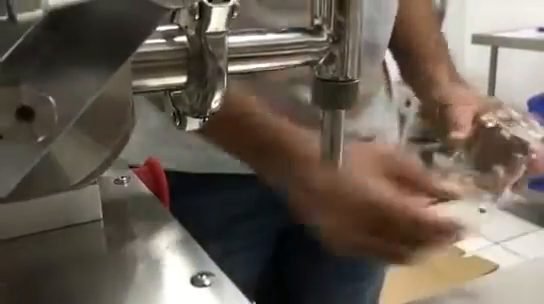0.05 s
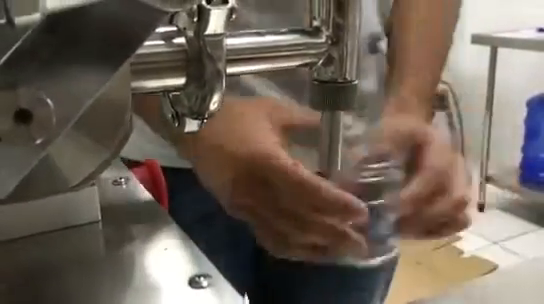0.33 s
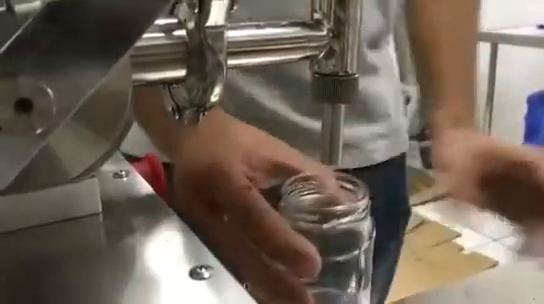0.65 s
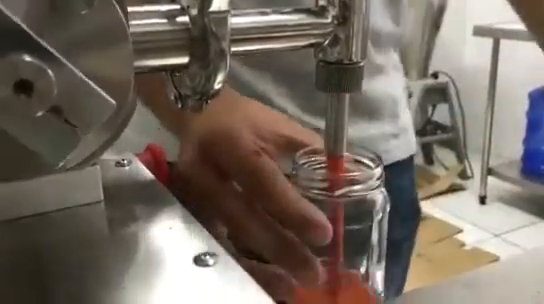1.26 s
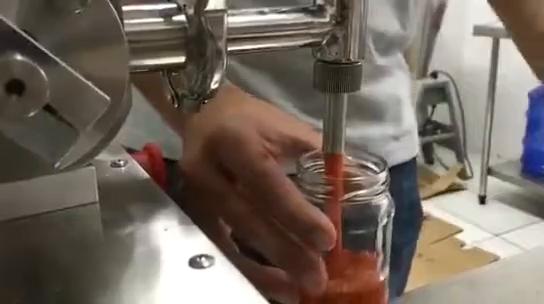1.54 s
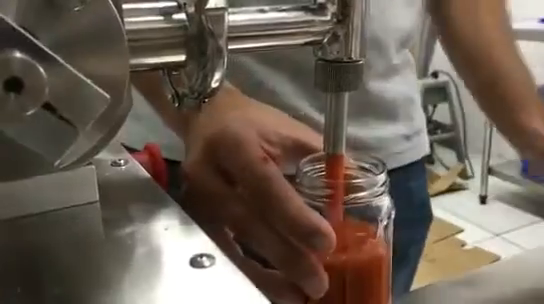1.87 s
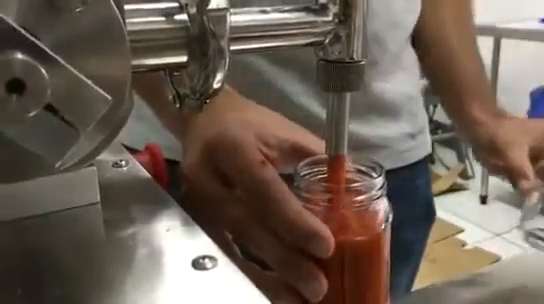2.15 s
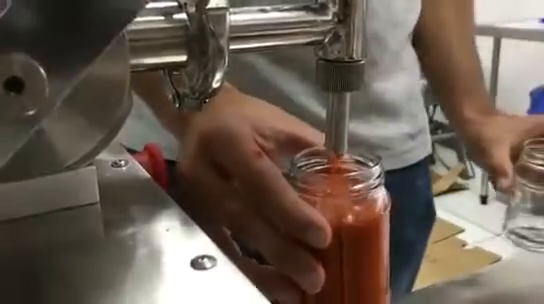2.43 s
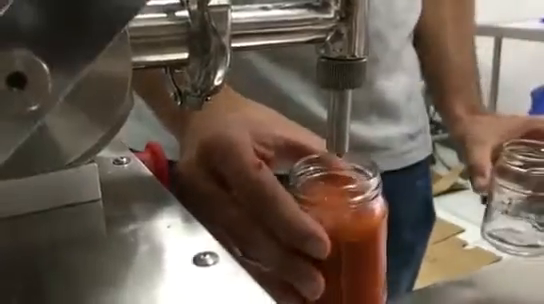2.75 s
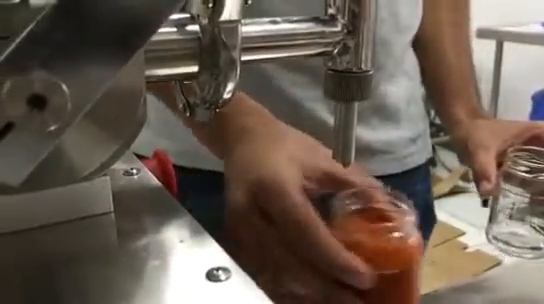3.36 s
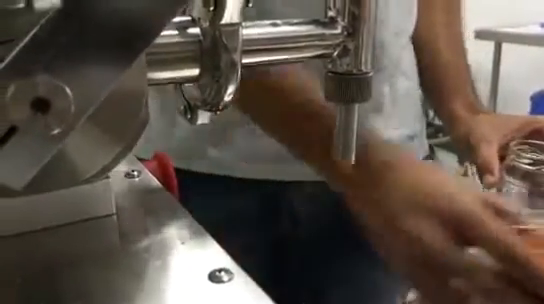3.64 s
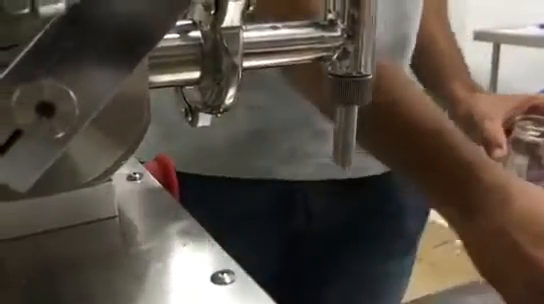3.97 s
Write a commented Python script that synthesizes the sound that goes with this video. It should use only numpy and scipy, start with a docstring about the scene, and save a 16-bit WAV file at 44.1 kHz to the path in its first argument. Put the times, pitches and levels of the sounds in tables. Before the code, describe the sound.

A pneumatic filling machine clacks and hisses over a steady motor hum.

```python
"""Motor hum and a brief scrape open the scene: a hard-walled workroom with a pneumatic piston filler.
An air valve snaps over and exhausts in a turbulent jet, and the rotary sauce valve knocks on its stop.
Air hisses through the stroke, coloured by steel resonances, as the piston doses thick sauce into a jar.
The valve snaps back with another exhaust, and the full jar slides and taps over the steel table."""
import sys
import numpy as np
from scipy import signal
from scipy.fft import rfft, irfft
from scipy.io import wavfile
from scipy.ndimage import uniform_filter1d

SR = 44100
rng = np.random.default_rng(int(sys.argv[2]) if len(sys.argv) > 2 else 0)


def store_pcm(level_fs):
    """Save levels as 16-bit WAV."""
    pcm = np.round(np.clip(level_fs, -1, 1) * 32767).astype(np.int16)
    wavfile.write(sys.argv[1], SR, np.atleast_2d(pcm).T)


N = 176400
TIME, FREQS = np.arange(N) / SR, np.fft.rfftfreq(N, 1 / SR)


def amp(db):
    """Amplitude ratio of a level in decibels."""
    return 10 ** (np.asarray(db) / 20)

def unit_rms(x):
    """Normalisation to an rms of 1."""
    return x / np.sqrt(np.mean(x ** 2) + 1e-20)

def curve_at(points, hz):
    """Interpolation on a logarithmic frequency axis."""
    freqs, values = np.transpose(points)
    return np.interp(np.log(hz + 1), np.log(freqs + 1), values)

def add(mix, start, sound):
    """Superposition of a sound on the mix, from a start time in seconds."""
    part = mix[round(start * SR):][:len(sound)]
    part += sound[:len(part)]

def hump(middle, length):
    """Gaussian envelope: a smooth rise and fall."""
    return np.exp(-2 * ((TIME - middle) / length) ** 2)

def tone(hz):
    """Simple harmonic motion with a random phase."""
    return np.sin(2 * np.pi * (hz * TIME + rng.random()))

def noise(gain):
    """Random-phase noise of unit rms with the given spectral shape."""
    return unit_rms(irfft(gain * np.exp(2j * np.pi * rng.random(N // 2 + 1)), N))

def band(hz, half_width_hz):
    """Random excitation of one resonance gives narrow-band noise."""
    return noise(1 / (1 + ((FREQS - hz) / half_width_hz) ** 2))

def mode(start, hz, t60):
    """Free vibration of a damped oscillator, falling 60 dB in t60 seconds."""
    t = np.maximum(TIME - start, 0)
    return np.exp(-np.log(1000) * t / t60) * np.sin(2 * np.pi * hz * t)

def impact(rise_s, decay_s, spectrum):
    """Modal overlap: the dense modes of a struck part merge into a decaying burst of noise."""
    t = np.arange(SR // 2) / SR
    envelope = np.minimum(t / rise_s, 1) * np.exp(-t / decay_s)
    burst = rfft(envelope * rng.standard_normal(len(t)), SR)  # 1 Hz per bin
    burst /= np.sqrt(uniform_filter1d(abs(burst) ** 2, size=500) + 1e-12)  # whitening
    gain = amp(curve_at(spectrum, np.arange(len(burst))))
    coloured = irfft(burst * gain)[:len(t)]
    return unit_rms(coloured) * np.sqrt(np.mean(envelope ** 2))

# Ambient noise spectrum (frequency [Hz], relative level [dB])
AMBIENT_SPECTRUM = [(20, -37), (32, -19.5), (49, -4.5), (70, -10), (105, -14), (128, -2.5), (145, -13.5),
                    (169, -12), (205, -9.5), (250, -14.5), (314, -17), (390, -18), (490, -20.5), (700, -21),
                    (911, -22.5), (1200, -19.5), (1800, -21), (2150, -21.5), (2400, -27.5), (2650, -25),
                    (3000, -30), (3900, -31), (4250, -28), (5000, -33.5), (6500, -31.5), (7500, -33)]
def workroom(level_db=-31, flicker_db=2):
    """Broadband noise of fans and distant machines, modulated at random in time and frequency."""
    steady = noise(amp(curve_at(AMBIENT_SPECTRUM, FREQS)))
    spectra = signal.stft(steady, nperseg=512)[2]
    patches = uniform_filter1d(rng.standard_normal(spectra.shape), size=6, axis=0)
    patches = unit_rms(uniform_filter1d(patches, size=8, axis=1))
    return amp(level_db) * signal.istft(spectra * amp(flicker_db * patches), nperseg=512)[1][:N]

# Motor tones (frequency [Hz], level [dB], noise half-width [Hz], noise amplitude share [0-1])
MOTOR_TONES = [(64.6, -36.5, 3.6, .75), (85.5, -38.5, 4, .6), (104.54, -36.5, 2.8, .45),
               (120.2, -35.5, 3.2, .6), (162.2, -44.5, 9, 0.9), (351, -42.5, 9.4, 0.9),
               (366.7, -48, 9.4, 0.9), (585, -50.5, 9, 1), (766, -53, 14, 1)]
def motors(swell_db=-28, swell_hz=(81, 100.2)):
    """Beating: motor tones waver against narrow-band noise, and two low tones throb in one swell."""
    out = amp(swell_db) * hump(middle=0.76, length=0.32) * sum(tone(hz) for hz in swell_hz)
    for hz, db, half_width_hz, share in MOTOR_TONES:
        steady = np.sqrt(2 * (1 - share ** 2)) * tone(hz)
        out += amp(db) * (steady + share * band(hz, half_width_hz))
    return out

# Reverberation time of the workroom (frequency [Hz], T60 [s])
REVERB_TIMES = [(100, 0.39), (1000, 0.43), (3000, 0.22), (7500, 0.061)]
def reverberation(sound, level_db=-4.5, reflections_per_s=2000, gap_s=0.004):
    """Absorption: sparse wall reflections decay exponentially, each band at its own rate."""
    reflections = rng.choice([-1., 1.], SR) * (rng.random(SR) < reflections_per_s / SR)
    reflections *= np.arange(SR) > gap_s * SR
    hz, t, spectra = signal.stft(reflections, SR, nperseg=256)
    decay = np.exp(-np.log(1000) * t / curve_at(REVERB_TIMES, hz)[:, None])
    tail = signal.istft(spectra * decay, SR, nperseg=256)[1]
    return amp(level_db) * signal.fftconvolve(sound, tail / np.linalg.norm(tail))[:N]

# Sliding movements (mid time [s], duration [s], level [dB], centre frequency [Hz], width [octaves])
SLIDES = [(0.007, 0.12, -31.5, 1490, 1.44), (0.05, 0.35, -40, 2600, 1.9), (1.953, 0.28, -30.5, 1700, 1.4),
          (2.77, 0.11, -40.5, 3060, 2.5), (3.08, 0.19, -38, 2500, 2.2), (3.198, 0.18, -39, 2500, 2.1),
          (3.455, 0.18, -35.5, 2300, 1.7), (3.465, 0.06, -33.5, 2650, .8), (3.45, 0.11, -33.5, 405, 0.33),
          (3.123, 0.14, -39.5, 410, 0.49), (3.7, 0.34, -42.5, 2240, 0.98), (3.914, 0.079, -39.5, 1990, 1.8)]
def friction(grain_db=2.6):
    """Sliding friction of piston, hand and jar: grainy noise swells and fades with each movement."""
    out = np.zeros(N)
    for middle, length, db, hz, octaves in SLIDES:
        colour = 1 / (1 + (2 * np.log2((FREQS + 1) / hz) / octaves) ** 2)
        roughness_db = grain_db * band(0, half_width_hz=49)
        out += amp(db + roughness_db) * hump(middle, length) * noise(colour)
    return out

# Spectrum of the struck jar (frequency [Hz], relative level [dB])
GLASS_SPECTRUM = [(300, -19), (1300, -8), (1750, -16.5), (2150, 3.5), (2700, 1), (3100, -13), (3700, -7.5),
                  (4500, -13.5), (7500, -16), (9000, -51.5)]
# Contacts of the handled jar (time [s], level [dB])
JAR_CONTACTS = [(3.03, -31), (3.218, -30), (3.231, -32), (3.356, -32), (3.38, -31), (3.432, -30),
                (3.463, -27), (3.648, -33), (3.728, -34), (3.8375, -21.5), (3.9, -33)]
def jar_taps():
    """Damped impacts: the glass catches and taps while the hand absorbs its ringing."""
    out = np.zeros(N)
    for start, db in JAR_CONTACTS:
        add(out, start, amp(db) * impact(rise_s=0.00065, decay_s=0.004, spectrum=GLASS_SPECTRUM))
    return out

# Air-line whistles (mid time [s], duration [s], level [dB], frequency [Hz], half-width [Hz])
LINE_WHISTLES = [(1.15, .1, -33, 3150, 60), (1.22, .16, -32, 3920, 110), (1.42, .2, -40, 2950, 24),
                 (1.57, .09, -39.5, 2950, 24), (2.1, .7, -48.5, 6040, 65)]
def whistles():
    """Flow-excited resonance: escaping air sounds one pitch after another as the pressure changes."""
    return sum(amp(db) * hump(middle, length) * band(hz, half_width_hz)
               for middle, length, db, hz, half_width_hz in LINE_WHISTLES)

# Resonances of the steel body and air line (frequency [Hz], width [Hz], peak gain [dB])
STEEL_RESONANCES = [(1609, 22, 6), (1840, 40, 3), (2110, 22, 4), (2477, 22, 8), (2916, 20, 6),
                    (2960, 45, 5), (3134, 30, 6), (3247, 16, 5), (3400, 35, 3), (3662, 22, 6),
                    (3854, 24, 6), (4020, 22, 4), (4220, 26, 4), (4370, 16, 6), (5250, 60, 3),
                    (5690, 40, 4), (6010, 40, 4), (6147, 20, 7), (6670, 40, 5)]
def steel_gain_db():
    """Resonance: the machine lifts narrow bands of the sound that passes through it."""
    return sum(db / (1 + (2 * (FREQS - hz) / width) ** 2) for hz, width, db in STEEL_RESONANCES)

def air_jet(spectrum):
    """Source and filter: turbulent noise is shaped by its port and by the machine's resonances."""
    return noise(amp(curve_at(spectrum, FREQS) + steel_gain_db()))

# Envelope of the air bleeding from the cylinder (time [s], level [dB])
BLEED_ENVELOPE = [(1.1, -64), (1.25, -38), (1.45, -30.5), (1.7, -29), (1.9, -30.5), (2.1, -31.5),
                  (2.289, -31.5), (2.5, -32), (2.9, -46)]
# Spectrum of that air (frequency [Hz], relative level [dB])
BLEED_SPECTRUM = [(500, -14.5), (1200, -18), (1800, 1), (2300, -10.5), (2950, -2), (3350, -3), (3850, 0.5),
                  (4500, -0.5), (5200, -8), (6050, -4), (6800, -9.5), (7500, -8.5)]
def piston_stroke():
    """Throttled flow: air bleeds out in a sustained hiss while the piston pushes the sauce."""
    level_db = np.interp(TIME, *np.transpose(BLEED_ENVELOPE), left=-120, right=-120)
    return amp(level_db) * air_jet(BLEED_SPECTRUM)

# Recoils of the frame (time [s], level [dB])
RECOILS = [(1.096, -20), (2.3255, -13)]
def frame_thumps(hz=190, t60=0.05):
    """Reaction force: each switch of the air valve excites one low mode of the frame."""
    return sum(amp(db) * mode(start, hz, t60) for start, db in RECOILS)

# Modes of the rotary valve's stop (frequency [Hz], level [dB], T60 [s])
STOP_RESONANCES = [(555, -17.5, .04), (655, -18, .14), (705, -30, .11), (1254, -36, .2), (2030, -12, .022),
                   (2380, -10.5, .02), (2950, -18, .02)]
# Strikes on the stop (time [s], gain [dB])
STOP_STRIKES = [(1.1802, 0), (2.523, -15)]
def stop_ring():
    """Modal superposition: struck by the rotary valve, the stop gives a short hollow clunk."""
    return sum(amp(strike_db + db) * mode(start, hz, t60)
               for start, strike_db in STOP_STRIKES for hz, db, t60 in STOP_RESONANCES)

# Spectra of parts 0-3: valve body, rotary stop, frame, valve spool (frequency [Hz], relative level [dB])
PART_SPECTRA = [
    [(60, -12), (180, 2), (330, -3), (520, -12), (1000, -2), (1400, -2), (1800, 1), (2500, 1), (3050, -2),
     (3700, -13), (5000, -19), (7500, -21), (9000, -50)],
    [(100, -18), (350, -14), (520, 1), (640, 5), (850, -5), (1500, -9), (2000, 1), (2350, 4), (2700, -7),
     (5000, -19), (7500, -26), (9000, -50)],
    [(80, -4), (220, 1), (500, -2), (1000, 1), (1550, 1), (2300, -8), (3000, -7), (4500, -13), (5800, -12),
     (7500, -20), (9000, -50)],
    [(500, -25), (2000, -16), (3800, -12), (4700, -17), (5700, -7), (6350, -10), (6750, 2), (7050, 0),
     (7600, -5), (9000, -50)],
]
# Impacts in the machine (time [s], level [dB], rise time [s], decay time constant [s], part [index])
MACHINE_IMPACTS = [(1.028, -40, .002, .012, 3), (1.071, -31, .004, .025, 3), (1.069, -23, .018, .02, 0),
                   (1.0858, -13, .002, .004, 3), (1.0895, -14.5, .001, .005, 0),
                   (1.097, -23, .001, .006, 0), (1.178, -17, .002, .004, 1), (1.562, -36, .002, .015, 0),
                   (1.714, -32, .003, .02, 3), (1.7205, -17, .004, .01, 2), (1.732, -22, .001, .01, 2),
                   (1.749, -23.5, .002, .014, 2), (2.307, -26, .012, .012, 0),
                   (2.3205, -22.5, .001, .01, 3), (2.3243, -8.5, .001, .0035, 0),
                   (2.331, -24, .001, .008, 0), (2.355, -25, .001, .005, 0), (2.521, -25.5, .003, .012, 1),
                   (2.523, -24.5, .003, .016, 2), (2.722, -41, .002, .012, 3)]
def knocks(resonance_depth=0.93):
    """Impulse response: valves and frame take blows, and the steel body rings on after each."""
    blows = np.zeros(N)
    for start, db, rise_s, decay_s, part in MACHINE_IMPACTS:
        add(blows, start, amp(db) * impact(rise_s, decay_s, PART_SPECTRA[part]))
    # A one-sided cepstrum gives minimum phase, so the ringing follows the blow.
    cepstrum = irfft(np.log(amp(resonance_depth * steel_gain_db())), N)
    one_sided = (1 + np.sign(TIME)) * (np.arange(N) < N // 2)
    body_response = np.exp(rfft(cepstrum * one_sided))
    return irfft(rfft(blows) * body_response, N)

# Spectra of exhaust ports 0 and 1 (frequency [Hz], relative level [dB])
PORT_SPECTRA = [
    [(200, -31), (600, -3), (1100, -11), (1700, -6), (2300, -6), (3100, -5), (3950, -1.5), (4800, -9.5),
     (5400, -6), (6100, -4), (6800, -10.5), (7500, -13)],
    [(200, -38), (600, -11), (1100, -4), (1850, 4), (2300, -3.5), (3200, 2), (4200, -2), (4850, -2.5),
     (5400, 2), (6100, 0), (6800, -5), (7500, -8.5)],
]
# Releases of air (time [s], level [dB], decay rate [dB/s], open time [s], port [index])
AIR_RELEASES = [(1.088, -18.5, 41, 0.48, 0), (1.715, -23, 120.5, 0.05, 1), (2.324, -22.5, 26, 0.17, 1)]
def exhausts(rise_s=0.0024, shut_db_per_s=104):
    """Blowdown of a cylinder: the jet's hiss decays with the pressure, then faster as the port shuts."""
    out = np.zeros(N)
    for start, db, decay_db_per_s, open_s, port in AIR_RELEASES:
        t = np.maximum(TIME - start, 0)
        level_db = db - decay_db_per_s * t - shut_db_per_s * np.maximum(t - open_s, 0)
        out += np.minimum(t / rise_s, 1) * amp(level_db) * air_jet(PORT_SPECTRA[port])
    return out

def scene():
    """Superposition at one point, alike in both channels; the knocks and jar taps reverberate."""
    hits = knocks() + jar_taps()
    struck = hits + reverberation(hits) + stop_ring() + frame_thumps()
    air = exhausts() + piston_stroke() + whistles()
    mono = struck + air + friction() + workroom() + motors()
    return np.array([mono, mono])

def record(dry, cutoff_hz=7640):
    """Band limiting: a steep low-pass filter removes the top of the treble."""
    lowpass = signal.firwin(1023, cutoff_hz, window=("kaiser", 7), fs=SR)
    return signal.oaconvolve(dry, lowpass[None], "same")


dry = scene()
out = record(dry)
store_pcm(out)
```